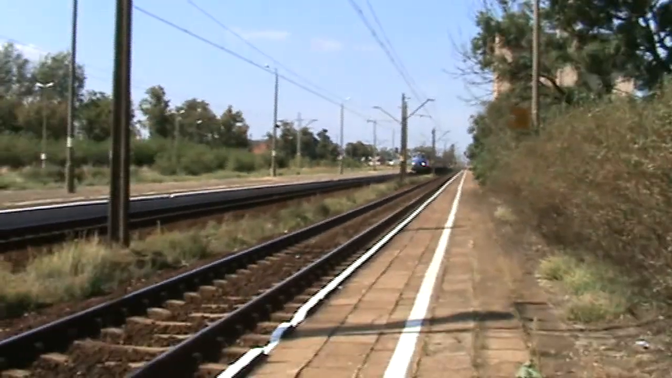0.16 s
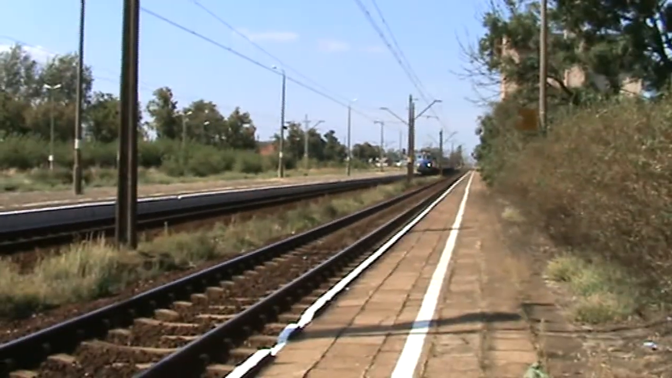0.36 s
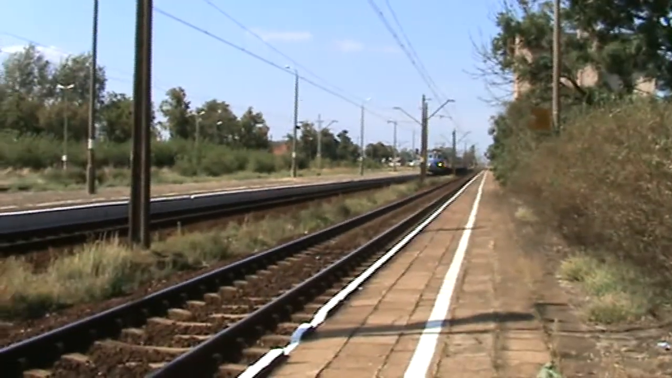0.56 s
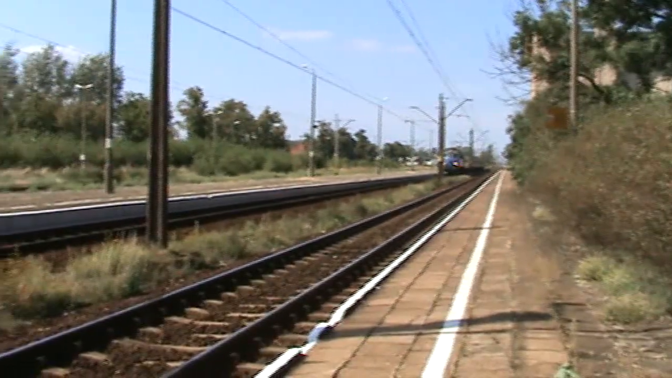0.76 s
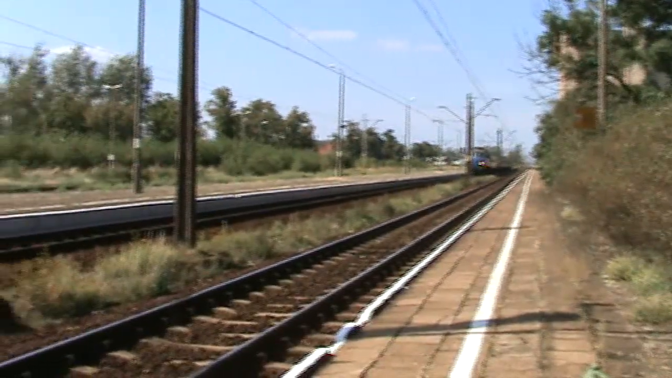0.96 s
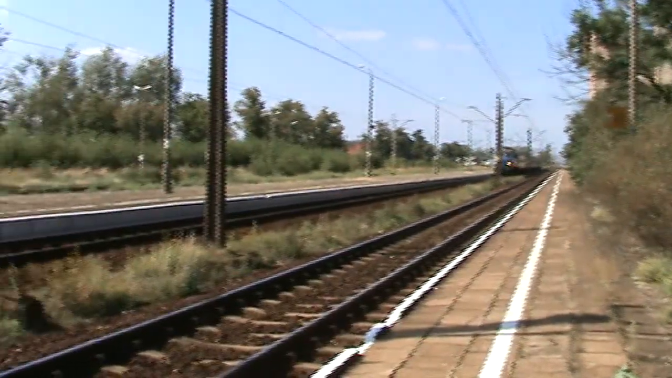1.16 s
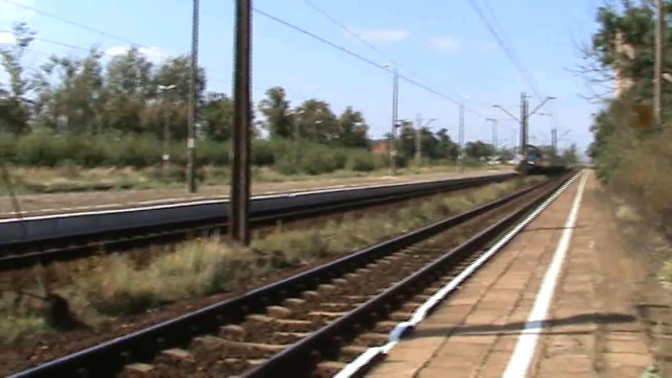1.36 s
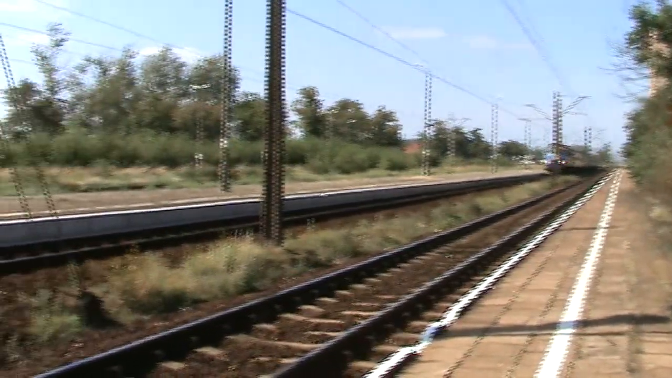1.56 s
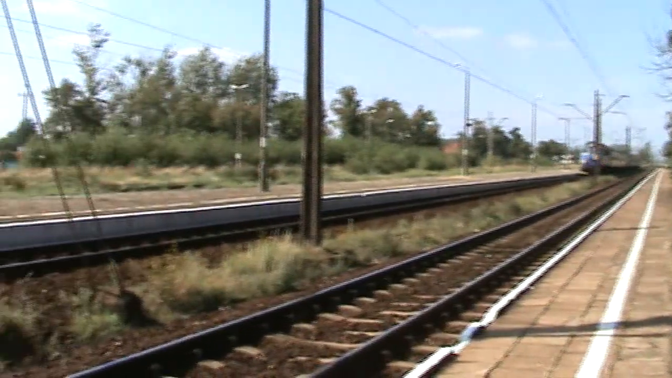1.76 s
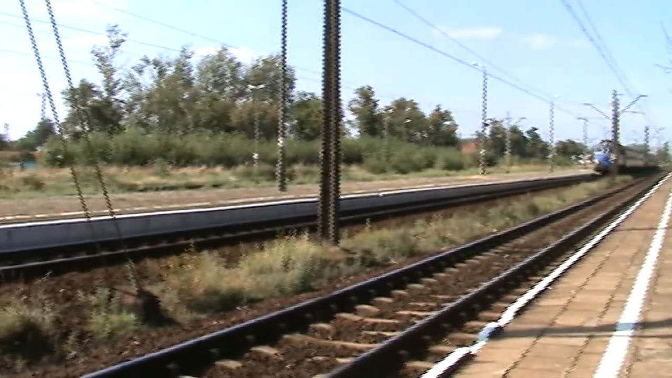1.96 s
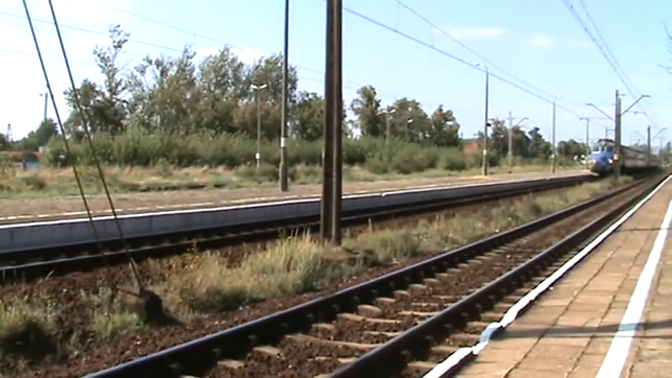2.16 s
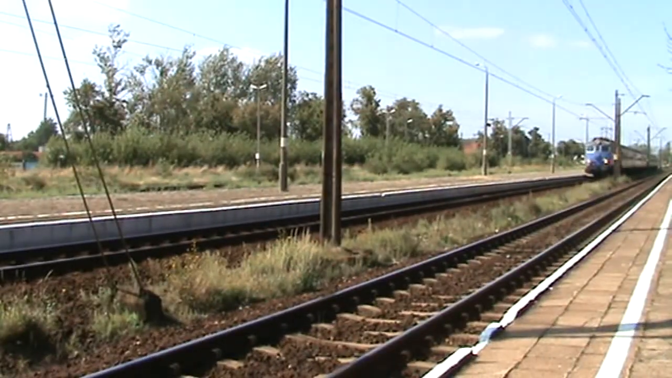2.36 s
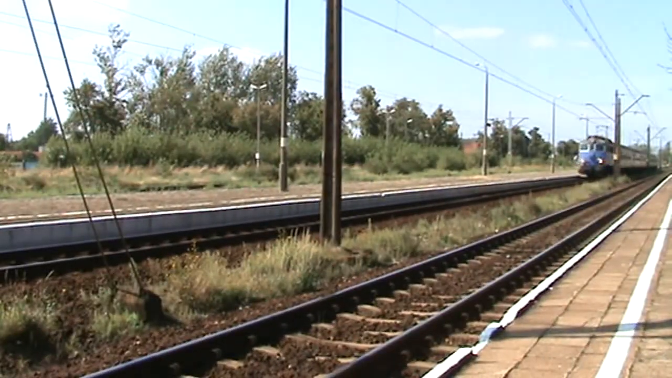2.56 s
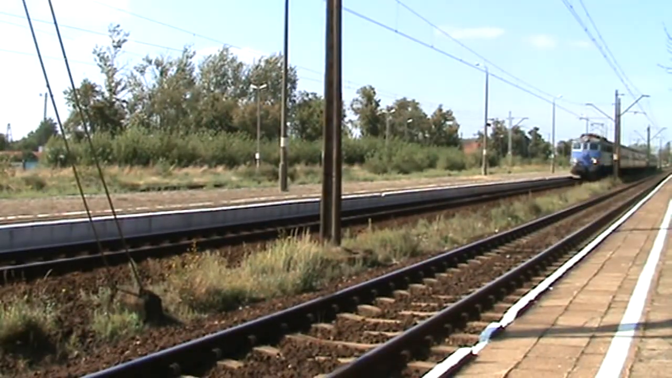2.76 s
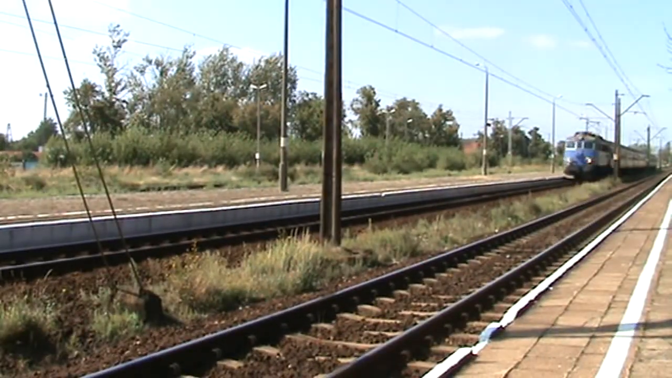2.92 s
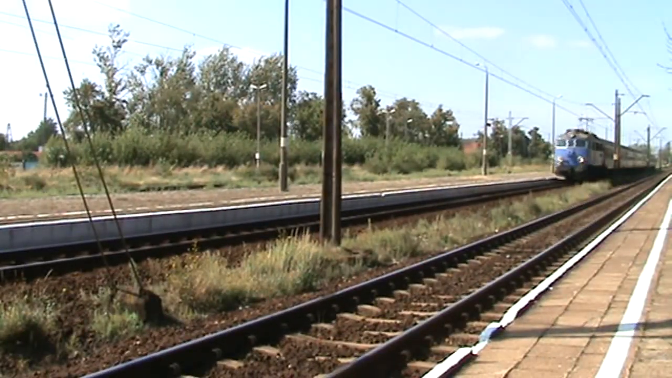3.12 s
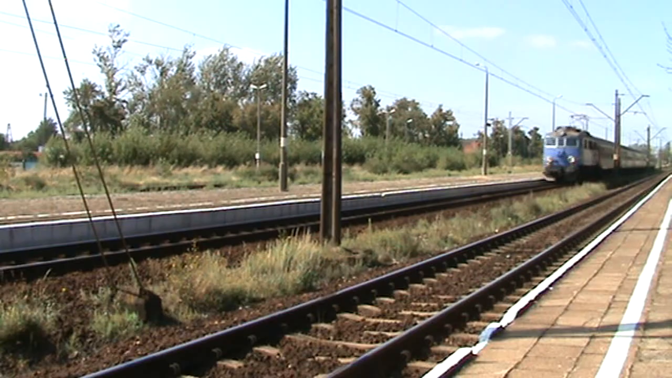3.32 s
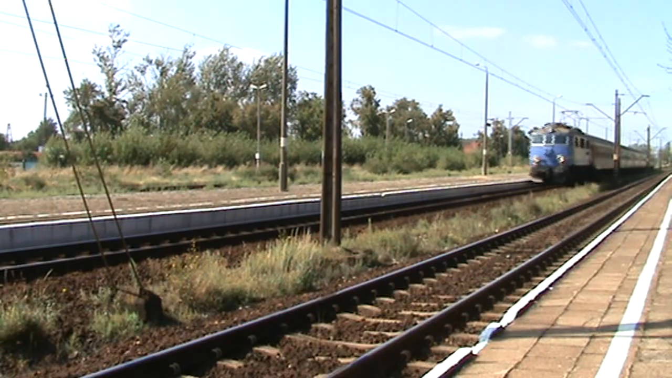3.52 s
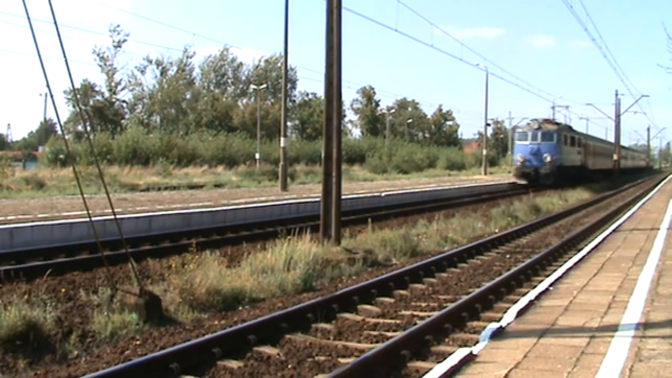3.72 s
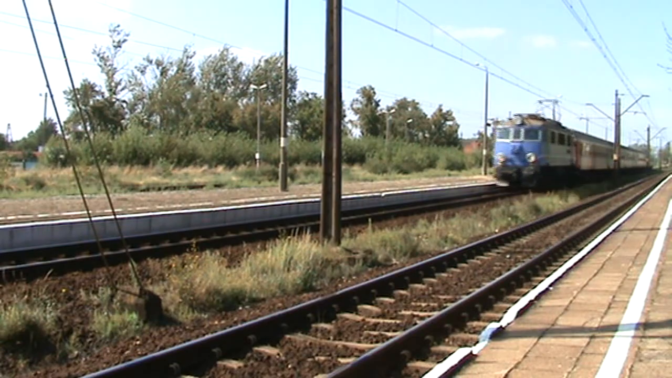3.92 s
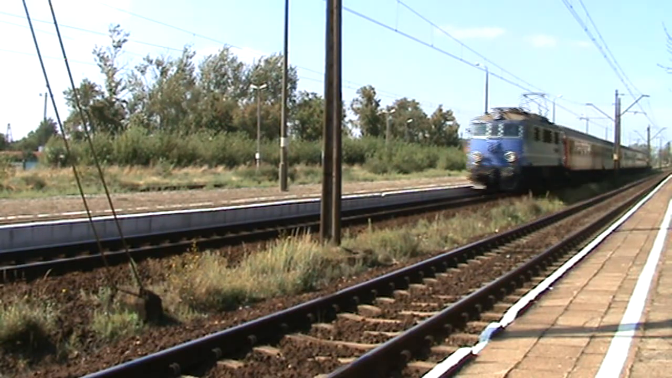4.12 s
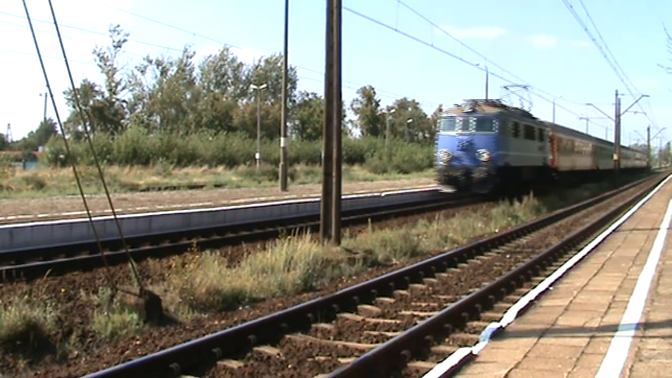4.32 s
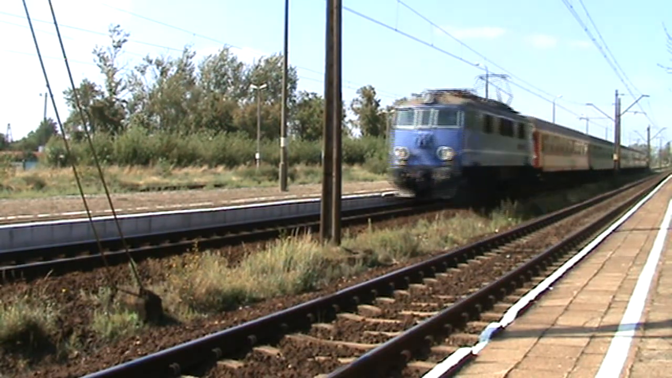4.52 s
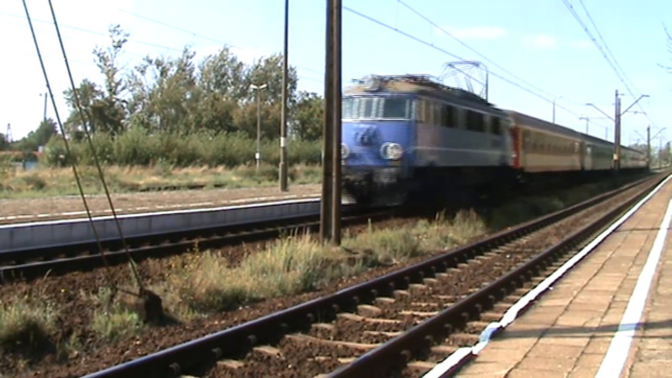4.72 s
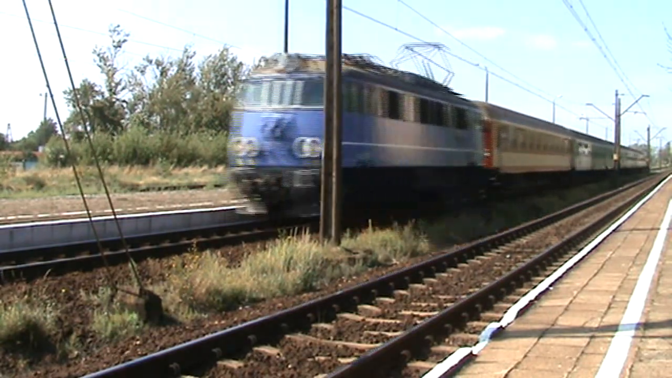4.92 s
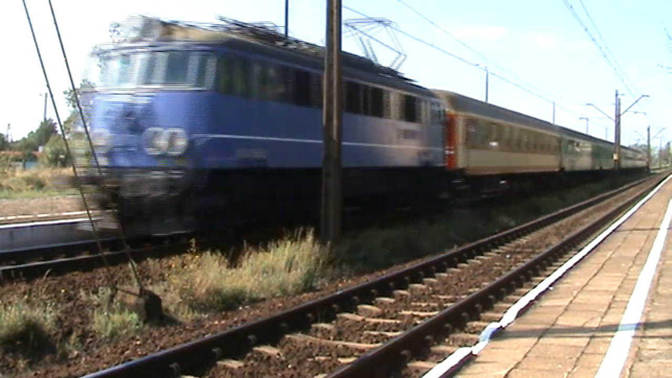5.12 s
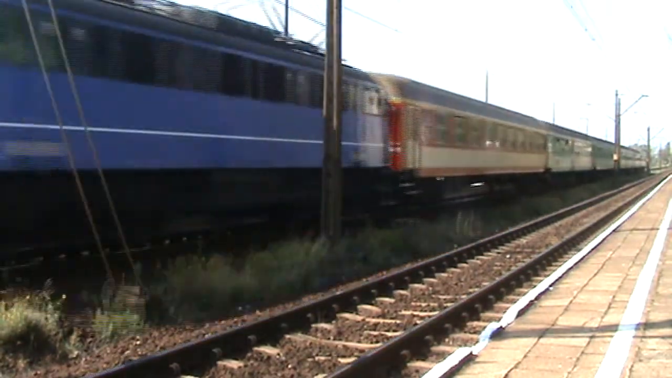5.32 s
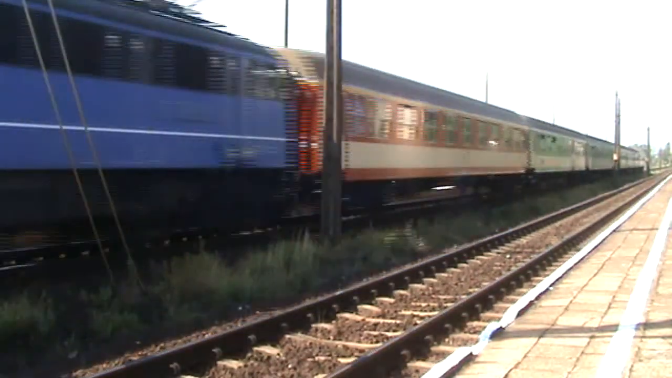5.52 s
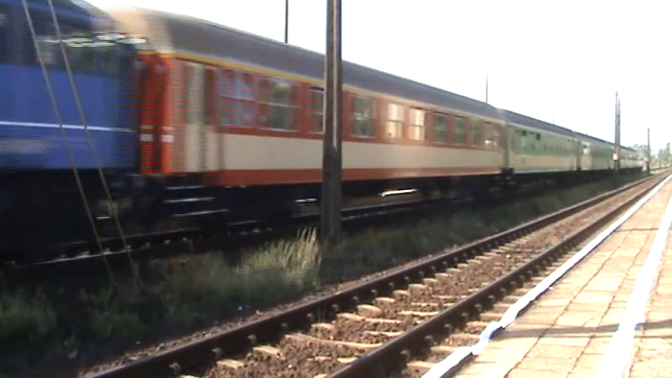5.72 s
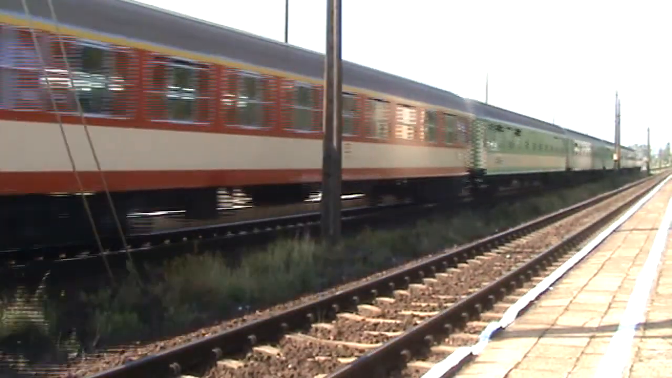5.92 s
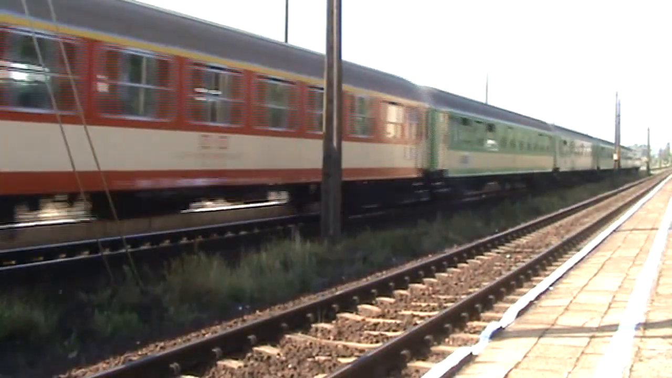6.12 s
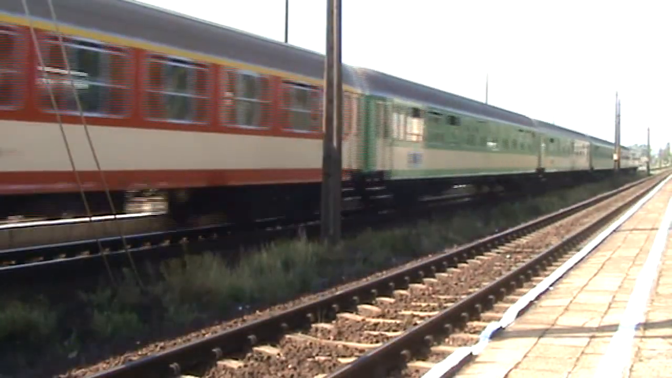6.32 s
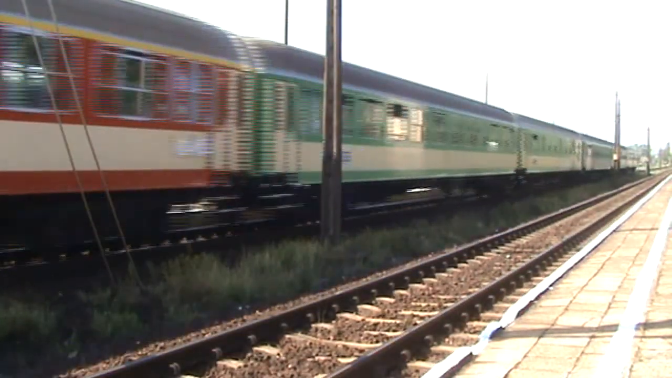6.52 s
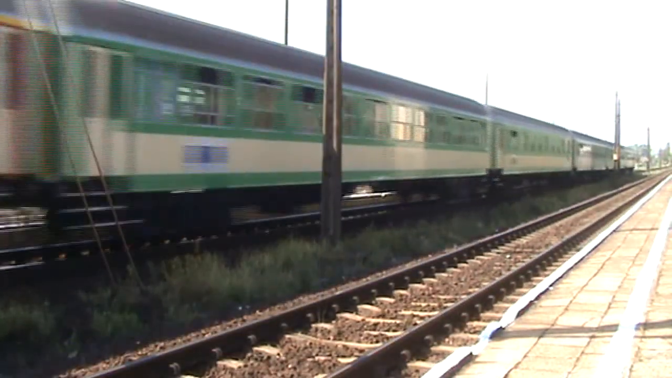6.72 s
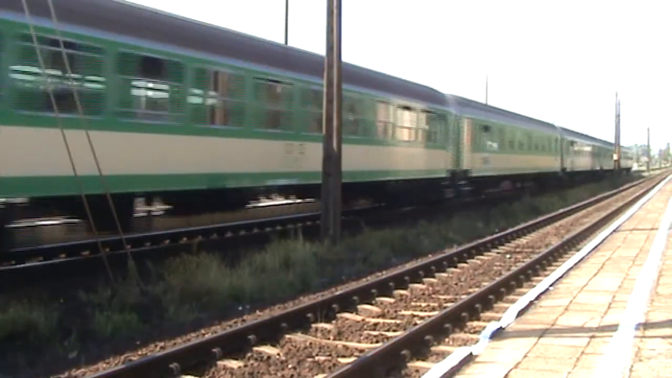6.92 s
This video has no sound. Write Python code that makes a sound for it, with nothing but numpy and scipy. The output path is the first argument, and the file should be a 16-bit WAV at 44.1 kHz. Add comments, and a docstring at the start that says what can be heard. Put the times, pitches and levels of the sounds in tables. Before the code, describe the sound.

At a small open-air station, a distant train rumbles softly while a small bird gives a few faint chirps. The rails tick and sing thinly as the rolling noise swells. Wind thumps the microphone, and the electric locomotive whines briefly, then passes close on the left with a loud, hollow roar and rapid knocking. Its coaches follow, their wheels rattling, ringing and hissing, still loud at the end.

```python
"""An electric passenger train rolls through a small open-air station, passing on the left.
Its wheels roar on the rails: shaped noise that swells, combed by a sliding ground echo and rattled by
rough treads. The rails sing and tick ahead of it, the drive whines briefly, the running gear knocks
and the coach wheels ring as they go by. Air buffets the microphone; small birds chirp early on."""
import sys
import numpy as np
from scipy import signal
from scipy.fft import rfft, irfft, next_fast_len
from scipy.io import wavfile
from scipy.ndimage import uniform_filter1d

SR = 44100
rng = np.random.default_rng(int(sys.argv[2]) if len(sys.argv) > 2 else 0)


def unload_wav(signal):
    """Save mono or channel-first audio to the path in sys.argv[1] as 16-bit WAV at rate SR, clipped to [-1, 1]."""
    wavfile.write(
        sys.argv[1],
        SR,
        np.round(np.clip(np.atleast_2d(signal).T, -1, 1) * 32767).astype(np.int16),
    )


N = 307368
FRAME, HOP = 2048, 512
TIMES = np.arange(N // HOP + 5) * HOP / SR
HZ = np.fft.rfftfreq(FRAME, 1 / SR)

# Chirps. Each row: start and length in seconds, first and last pitch in Hz, level in dB.
CHIRPS = [(1.115, .07, 5080, 4850, -49), (1.58, .045, 4000, 4080, -46), (1.975, 0.042, 4480, 4550, -49)]
# Wind thumps. Each row: time in seconds, left and right level in dB, half length in seconds, centre in Hz.
GUSTS = [(3.929, -17.5, -21.5, 0.0096, 115), (3.96, -36, -21, 0.025, 70.6), (4.032, -36, -19, 0.021, 50),
         (4.103, -27, -21, 0.022, 45), (4.73, -24, -28, .04, 75)]
# High modes of the rails. Each row: centre and width in Hz, relative level in dB.
RAIL_MODES = [(9460, 40, -4.5), (9380, 230, -6.5), (7370, 700, -12.5)]
# Knocks far up the line that make the rails sing out. Each row: start in seconds, level in dB.
RAIL_PINGS = [(2.71, -46), (3.011, -42)]
# Bright ticks. Each row: start in seconds, level in dB, decay in seconds, centre and width in Hz.
BRIGHT_TICKS = [(2.27, -29, .0011, 7240, 1400), (2.712, -39, .017, 7400, 897),
                (2.886, -30.5, .02, 4800, 1800), (3.005, -41, .012, 5000, 2000),
                (3.298, -36, 0.022, 5500, 2000)]
# Knocks of the running gear, often in pairs. Each row: start in seconds, level in dB.
GEAR_KNOCKS = [(4.205, -21), (4.25, -24), (4.292, -21), (4.382, -22), (4.408, -24), (4.515, -27),
               (4.537, -20), (4.638, -23), (4.685, -19.5), (4.724, -19), (4.745, -22), (4.815, -20.5),
               (4.843, -20), (4.935, -21), (4.966, -26), (5.155, -23), (5.208, -20), (5.365, -23),
               (5.46, -24), (5.585, -24), (5.72, -28), (5.839, -28), (5.99, -27), (6.062, -23)]
# The locomotive's drive whine and thin wheel ring. Each row: time in seconds, pitch in Hz, level in dB.
DRIVE_WHINE = [(3.5, 905, -43), (3.9, 892, -33), (4.15, 895, -30.5), (4.38, 900, -27), (4.58, 882, -29),
               (4.72, 878, -38), (5.0, 850, -55)]
LOCO_RING = [(3.75, 2630, -50), (3.97, 2612, -40.5), (4.07, 2605, -37.5), (4.25, 2590, -38.5),
             (4.54, 2560, -39.5), (4.66, 2600, -47), (4.83, 2620, -36), (4.95, 2600, -50)]
# Broad ring of the coach wheels. Each row: time in seconds, pitch and width in Hz, level in dB.
COACH_RING = [(5.7, 1621, 150, -38), (6.15, 1600, 130, -33), (6.47, 1540, 100, -24.5),
              (6.7, 1630, 140, -28), (6.97, 1660, 140, -23.5)]
# Modes of those wheels. Each row: multiple of the ring's pitch, relative level in dB.
COACH_MODES = [(1, 4), (1.44, -6), (2.12, -14), (2.65, -20)]
# Crossfades between five stages: far off, nearing, closing in, locomotive in front, coaches alongside.
# Each row: start and end in seconds.
STAGE_FADES = [(2.2, 2.83), (3.35, 3.74), (4.45, 4.85), (5.35, 6.4)]
# Ground echo, stage by stage. Each row: strength from 0 to 1, treble cutoff in Hz.
GROUND_ECHO = [(0.22, 3500), (0.35, 8100), (0.29, 4000), (0.01, 3500), (0.08, 2000)]
# Stereo image at the microphone's two ports in each stage. Each row: frequency in Hz,
# left over right in dB, left lead in radians, likeness from 0 to 1.
IMAGE_FAR = [(65, 5.4, 0.47, 0.96), (200, 4.9, 0.47, 0.9), (430, 2.2, 0.82, 0.88), (630, 2.2, 0.46, 0.93),
             (900, -0.1, 0.53, 0.69), (1400, 1.0, 0.27, 0.89), (3000, 0.3, 0.02, 0.95),
             (6500, 0.3, -0.02, 0.94)]
IMAGE_NEARING = [(65, 10.8, 1.61, 0.8), (200, 7.7, 1.08, 0.85), (430, 2.7, 1.11, 0.95),
                 (630, 2.0, 0.53, 0.93), (900, 1.0, 0.87, 0.71), (1400, 0.4, 0.31, 0.9),
                 (3000, 0.4, 0.02, 0.93), (6500, 0.3, 0.0, 0.96)]
IMAGE_CLOSING = [(65, 9.6, 1.95, 0.82), (200, 8.3, 1.27, 0.87), (430, 4.3, 1.0, 0.94),
                 (630, 3.0, 0.5, 0.88), (900, 3.1, 0.83, 0.88), (1400, 0.4, 0.33, 0.9),
                 (3000, 0.2, 0.07, 0.95), (6500, 0.1, -0.02, 0.98)]
IMAGE_FRONT = [(65, 5.6, 2.5, 0.74), (200, 8.4, 1.58, 0.69), (430, 6.8, 0.91, 0.94), (630, 5.4, 0.72, 0.87),
               (900, 5.2, 0.46, 0.88), (1400, 3.0, 0.26, 0.91), (3000, 1.3, 0.08, 0.95),
               (6500, 0.0, -0.0, 1.0)]
IMAGE_ALONGSIDE = [(65, 9.5, 1.74, 0.65), (200, 10.5, 1.55, 0.83), (430, 11.1, 1.11, 0.89),
                   (630, 9.4, 0.95, 0.87), (900, 10.2, 0.61, 0.76), (1400, 7.5, 0.17, 0.82),
                   (3000, 6.3, 0.24, 0.73), (6500, 2.0, -0.03, 0.7)]
# A swing left and back as the first coach passes. Each row: time in seconds, extra left over right in dB.
PAN_SWING = [(5.2, -0.5), (5.65, 1.5), (6.3, 1.7), (6.7, -1.4)]
# Tone colour of the rolling noise in each stage. Each row: frequency in Hz, relative level in dB.
COLOUR_FAR = [(8, -28), (22, -25), (58, 2), (100, -2.5), (150, -4), (200, -3), (290, -6), (370, -6.5),
              (480, 1.5), (720, -2.2), (870, -3.2), (1070, -3), (1300, -6.5), (1850, -9), (2100, -11),
              (3900, -17.5), (5800, -26.5), (7600, -30), (8700, -34.5), (10000, -47)]
COLOUR_NEARING = [(8, -30), (22, -30), (65, 0), (115, -8), (210, -7), (305, -5), (365, -12.5), (480, 2.5),
                  (720, -2), (850, -4.5), (1050, -6.5), (1400, -12.5), (1750, -11.5), (4000, -21),
                  (7500, -32), (8600, -31.5), (10000, -42)]
COLOUR_CLOSING = [(8, -34), (22, -27), (55, -4.5), (110, -7), (220, -3), (330, -15), (470, 1), (700, 1.5),
                  (790, -5), (960, -2), (1300, -9.5), (2500, -16), (4200, -19), (5900, -25), (8000, -25),
                  (9400, -31.5), (10300, -37.5)]
COLOUR_FRONT = [(8, -37), (22, -30), (50, -9), (140, -8.5), (230, -6), (320, -15), (425, -1.5), (660, -2),
                (790, -2.5), (950, -2.5), (1600, -11), (2600, -16.5), (4000, -20), (5800, -27),
                (7500, -27.5), (9400, -33), (10300, -35.5)]
COLOUR_ALONGSIDE = [(8, -41), (22, -26), (70, -18.5), (130, -19), (185, -15), (270, -15), (450, -3),
                    (880, -1), (1300, -7), (1600, -6.5), (1900, -9.5), (2250, -11), (3200, -13),
                    (4100, -17), (4800, -22), (6200, -26), (8000, -43), (10000, -65.5)]
# Faders for its lows, mids and highs. Each row: time in seconds, level in dB ahead of the trims.
RUMBLE_FADER = [(0.0, -45), (0.65, -44.5), (1.15, -40.5), (2.0, -40), (2.35, -37), (2.9, -32.5), (3.6, -30),
                (4.0, -26.5), (4.8, -28), (5.4, -29), (6.0, -32.5), (6.7, -34.5), (6.97, -39)]
ROAR_FADER = [(0.0, -38), (0.64, -36.5), (0.97, -34.5), (1.6, -33.5), (2.34, -32), (2.85, -26.5),
              (3.33, -21.5), (3.8, -20), (4.39, -16.5), (6.27, -15.5), (6.95, -16.5)]
HISS_FADER = [(0.05, -49), (1.25, -46), (2.43, -45.5), (2.91, -35.5), (3.03, -37.5), (3.77, -32.5),
              (4.26, -27.5), (5.1, -28), (5.75, -27.5), (6.06, -30.5), (6.86, -28.5), (6.9, -28)]
# Wheel resonances and hiss that swell out of the roar.
# Each row: peak time and half length in seconds, centre and width in Hz, boost in dB.
SWELLS = [(0.402, 1.0, 4020, 130, 2), (0.4, .5, 980, 130, 3), (1.6, 0.45, 696, 110, 4.2),
          (2.45, .22, 490, 80, 2.5), (1.6, .5, 1720, 130, 2), (2.8, .25, 3880, 600, 2),
          (4.5, 0.28, 1920, 260, 3), (4.502, .3, 4050, 120, 2), (4.7, .6, 5230, 111, 3.5),
          (6.2, 0.24, 2250, 150, 7), (6.65, 0.43, 870, 90, 5), (6.85, 0.22, 8800, 3000, 21.5)]
# A hollow howl in the roar. Each row: time in seconds, centre in Hz, boost in dB.
HOWL = [(4.15, 560, -1), (4.55, 535, 5), (4.85, 480, 5.5), (5.1, 445, 6.5), (5.42, 520, 6.5), (5.7, 590, 4),
        (6.0, 680, 5.5), (6.35, 650, 0)]
# Treble dips between knocks. Each row: time and half length in seconds, gain in dB.
LULLS = [(4.236, .005, -1), (4.338, 0.0087, -3.5), (4.498, .005, -3), (4.775, 0.0046, -1),
         (4.88, 0.016, -3.5), (5.122, 0.009, -5), (5.535, .006, -5), (5.803, 0.0076, -5),
         (6.03, 0.0092, -4.5)]


def amp(db):
    """Decibels to gain."""
    return 10 ** (np.asarray(db) / 20)


def add(mix, s, sound):
    """Mixes a sound in from the time s on."""
    part = mix[..., max(round(s * SR), 0):][..., :sound.shape[-1]]
    part += sound[..., :part.shape[-1]]


def follow(rows, t):
    """The columns of an automation table at the times t."""
    s, *columns = np.transpose(rows)
    return [np.interp(t, s, c) for c in columns]


def over_hz(rows):
    """The columns of a frequency table on every bin."""
    hz, *columns = np.transpose(rows)
    return np.array([np.interp(np.log(HZ + 1), np.log(hz + 1), c) for c in columns])


def stage_at(t):
    """How far the pass has got at the times t, from 0 (far off) to 4 (coaches alongside)."""
    return sum(np.clip((t - start) / (end - start), 0, 1) for start, end in STAGE_FADES)


def staged(tables):
    """Frequency tables crossfaded as the train advances: columns x frames x bins."""
    stage = stage_at(TIMES)[:, None]
    return sum(np.maximum(1 - abs(stage - k), 0) * over_hz(rows)[:, None]
               for k, rows in enumerate(tables))


def at_level(power, db):
    """Scales each frame of a power spectrum to a level."""
    return power / power.sum(-1, keepdims=True) * amp(db)[:, None] ** 2


def three_band_eq(power, levels_db, edges_hz=(45, 330, 2400, 9000)):
    """Tilts each frame smoothly so that its lows, mids and highs come close to the given levels."""
    flats_hz = np.ravel([(20, 250), (420, 1700), (2800, 9000)])  # each band's gain is flat in its span
    gain_db = 0
    for k, db in enumerate(levels_db):
        band_power = power[:, (HZ >= edges_hz[k]) & (HZ < edges_hz[k + 1])].sum(-1)
        share = np.interp(np.log(HZ + 1), np.log(flats_hz), np.repeat(np.arange(3) == k, 2))
        gain_db = gain_db + (db - 10 * np.log10(band_power))[:, None] * share
    return power * amp(gain_db) ** 2


def resonance(hz, width):
    """Power response of a steep-sided resonance."""
    return 1 / (1 + ((HZ - hz) / width) ** 2 * 2) ** 2


def flicker(frames, bins):
    """Smooth random modulation over time and frequency, of spread 1."""
    noise = rng.standard_normal((len(TIMES), len(HZ)))
    noise = uniform_filter1d(uniform_filter1d(noise, frames, axis=0), bins, axis=1)
    return noise / noise.std()


def band_noise(hz, width, size=N):
    """Noise of rms 1 in a bell-shaped band."""
    padded = next_fast_len(size, real=True)
    bell = np.exp(-.5 * ((np.fft.rfftfreq(padded, 1 / SR) - hz) / width) ** 2)
    noise = irfft(rfft(rng.standard_normal(padded)) * bell, padded)[:size]
    return noise / noise.std()


def stereo_noise(power, start_lean=.55, lean_s=1.8):
    """Noise of the given power as the two ports hear it: the left is mostly louder and earlier."""
    balance_db, lead, likeness = staged(
        [IMAGE_FAR, IMAGE_NEARING, IMAGE_CLOSING, IMAGE_FRONT, IMAGE_ALONGSIDE])
    # the bass starts nearer the middle and leans left as the train comes into earshot
    lean = 1 - np.interp(TIMES, [0, lean_s], [1 - start_lean, 0])[:, None] * resonance(0, 500)
    lead = lean * lead
    swing_db = follow(PAN_SWING, TIMES)[0] * (TIMES > PAN_SWING[0][0])
    pan = amp((lean * balance_db + swing_db[:, None] * resonance(0, 6000)) / 2)
    a, b, c, d = rng.standard_normal((4, *power.shape))
    left = a + 1j * b
    right = likeness * np.exp(-1j * lead) * left + np.sqrt(1 - likeness ** 2) * (c + 1j * d)
    mid_power = (pan ** 2 + pan ** -2 + 2 * likeness * np.cos(lead)) / 4
    spectra = np.array([pan * left, right / pan]) * np.sqrt(1.5 * power / mid_power)
    return signal.istft(spectra.swapaxes(1, 2), nperseg=FRAME, noverlap=FRAME - HOP)[1][:, :N]


def birds(arch_hz=90):
    """Faint arched chirps from the bushes."""
    t, out = np.arange(N) / SR, np.zeros(N)
    for s, length, start_hz, end_hz, db in CHIRPS:
        progress = np.clip((t - s) / length, 0, 1)
        arch = np.sin(np.pi * progress)
        hz = start_hz + (end_hz - start_hz) * progress + arch_hz * arch
        out += amp(db) * arch * np.sin(2 * np.pi * np.cumsum(hz) / SR)
    return out


def gusts(width_hz=45):
    """Moving air hits the two ports unevenly in short, low thumps."""
    t, out = np.arange(-SR // 10, SR // 10) / SR, np.zeros((2, N))
    for s, left_db, right_db, length, hz in GUSTS:
        ports = np.array([amp(db) * band_noise(hz, width_hz, len(t)) for db in (left_db, right_db)])
        add(out, s + t[0], np.exp(-.5 * (t / length) ** 2) * ports)
    return out


def singing_rails(peak_s=3.45, peak_db=-48.5, rise_db_per_s=5.5, fall_db_per_s=11,
                  ping_decay_s=.15, flutter_db=3):
    """Power of the high rail modes, which carry far ahead of the train and sink away as it arrives."""
    since = TIMES - peak_s
    power = amp(peak_db + np.minimum(rise_db_per_s * since, -fall_db_per_s * since)) ** 2
    for s, db in RAIL_PINGS:
        power += (amp(db) * np.exp(-abs(TIMES - s) / ping_decay_s) * (TIMES >= s)) ** 2
    modes = sum(amp(db) ** 2 * resonance(hz, width) for hz, width, db in RAIL_MODES)
    return at_level(modes, 10 * np.log10(power)) * amp(flutter_db * flicker(frames=5, bins=6)) ** 2


def bright_ticks():
    """Hard-edged noise bursts: one sharp click, perhaps camera handling, then ticks from the track."""
    t, out = np.arange(SR // 10) / SR, np.zeros(N)
    for s, db, decay, hz, width in BRIGHT_TICKS:
        add(out, s, amp(db) * np.exp(-t / decay) * band_noise(hz, width, len(t)))
    return out


def gear_clatter(attack_s=.007, decay_s=.02):
    """The running gear knocks: bursts of one colour that build briefly and die quickly."""
    t, out = np.arange(SR // 10) / SR, np.zeros(N)
    envelope = np.minimum(t / attack_s, 1) * np.exp(-t / decay_s)
    for s, db in GEAR_KNOCKS:
        add(out, s, amp(db) * envelope * band_noise(hz=2700, width=1840, size=len(t)))
    return out


def locomotive_tone(rows, waver_hz, flutter, pan_db):
    """A wavering tone of the drive or the wheels that sags as the locomotive draws near."""
    t = np.arange(N) / SR
    hz, db = follow(rows, t)
    phase = 2 * np.pi * np.cumsum(hz + waver_hz * band_noise(0, 25.3)) / SR
    gate = (t > rows[0][0]) & (t < rows[-1][0])
    envelope = np.sqrt(2) * amp(db) * (1 + flutter * band_noise(0, 17)) * gate
    lead = .22 * pan_db  # the louder port also hears it earlier
    return envelope * np.array([amp(pan_db) * np.sin(phase + lead), amp(-pan_db) * np.sin(phase)])


def coach_wheels():
    """Power of the coach wheels' resonances while their bogies go by."""
    hz, width, db = follow(COACH_RING, TIMES)
    modes = sum(amp(mode_db) ** 2 * resonance(ratio * hz[:, None], width[:, None])
                for ratio, mode_db in COACH_MODES)
    return at_level(modes, db) * (TIMES > COACH_RING[0][0])[:, None]


def tread_rattle(train, far_db=.93, close_extra_db=1, rate_hz=24, spread_hz=44):
    """Rough spots on the treads shake the whole treble at once: a dense rattle with brief lulls."""
    t = np.arange(N) / SR
    treble = signal.sosfiltfilt(signal.butter(2, 1800, "high", fs=SR, output="sos"), train)
    depth_db = far_db + close_extra_db * np.maximum(1 - abs(stage_at(t) - 3) / 2, 0)
    shake_db = depth_db * np.tanh(band_noise(rate_hz, spread_hz))
    lull_db = sum(db * np.exp(-.5 * ((t - s) / length) ** 2) for s, length, db in LULLS)
    return train + treble * (amp(shake_db + lull_db) - 1)


def echo_comb(pass_s=5.07, speed_m_per_s=31.2, track_m=8.5, ground_ms=2.23, ms_per_doubling=.15,
              wall_ms=1.23, wall_gain=.2):
    """The ground echo lags most as the locomotive draws level; a wall echo colours the far train."""
    t = TIMES[:, None]
    stage = stage_at(t)
    distance_m = np.hypot(speed_m_per_s * (t - pass_s), track_m)
    delay_ms = ground_ms - ms_per_doubling * np.log2(distance_m / track_m)
    strength, cutoff_hz = (np.interp(stage, np.arange(5), c) for c in np.transpose(GROUND_ECHO))
    turn_per_ms = -2j * np.pi * HZ / 1000
    ground = strength * np.exp(turn_per_ms * delay_ms)
    wall = wall_gain * np.clip(1 - stage, 0, 1) * np.exp(turn_per_ms * wall_ms)
    return abs(1 + (ground + wall) / (1 + (HZ / cutoff_hz) ** 4)) ** 2  # ballast scatters the top end


def howl(width_hz=100, upper_ratio=1.82, upper_share=.45):
    """Boost in dB of two gliding resonances, lowest in pitch as the locomotive draws level."""
    hz, db = (c[:, None] for c in follow(HOWL, TIMES))
    return db * (resonance(hz, width_hz) + upper_share * resonance(upper_ratio * hz, width_hz))


def rolling_wheels(trim_db=-.51, hiss_trim_db=.35, flicker_db=.93):
    """Power of the wheels on the rails: rumble, roar and hiss, combed by the echoes."""
    colour_db, = staged([COLOUR_FAR, COLOUR_NEARING, COLOUR_CLOSING, COLOUR_FRONT, COLOUR_ALONGSIDE])
    for s, length, hz, width, db in SWELLS:
        colour_db += db * np.exp(-.5 * ((TIMES[:, None] - s) / length) ** 2) * resonance(hz, width)
    combed = amp(colour_db + howl()) ** 2 * echo_comb()
    rumble, roar, hiss = (follow(rows, TIMES)[0] for rows in (RUMBLE_FADER, ROAR_FADER, HISS_FADER))
    power = three_band_eq(combed, [rumble, roar, hiss + hiss_trim_db])
    return power * amp(trim_db + flicker_db * flicker(frames=12, bins=5)) ** 2


def scene():
    """The train pass, with gusts and birds around it."""
    wheels_and_rails = stereo_noise(rolling_wheels() + singing_rails() + coach_wheels())
    train = tread_rattle(wheels_and_rails + bright_ticks() + gear_clatter())
    drive = locomotive_tone(DRIVE_WHINE, waver_hz=13, flutter=.7, pan_db=2.5)
    wheel_ring = locomotive_tone(LOCO_RING, waver_hz=32, flutter=.59, pan_db=0)
    return train + drive + wheel_ring + gusts() + birds()


def record(dry, ceiling=.93, cutoff_hz=10300):
    """A soft clip rounds the highest peaks; a steep low-pass takes off the top end."""
    rounded = dry / (1 + (dry / ceiling) ** 8) ** (1 / 8)
    lowpass = signal.firwin(255, cutoff_hz, window=("kaiser", 9), fs=SR)
    return signal.oaconvolve(rounded, lowpass[None], "same")


dry = scene()
out = record(dry)
unload_wav(out)
```